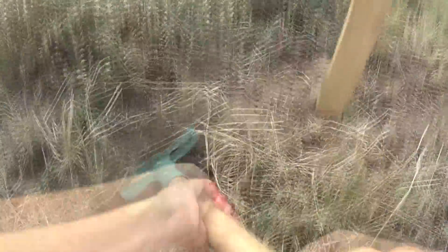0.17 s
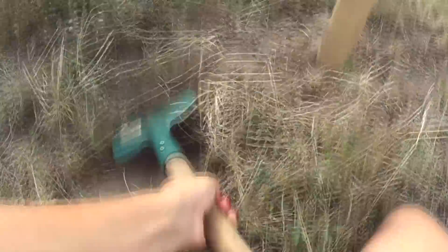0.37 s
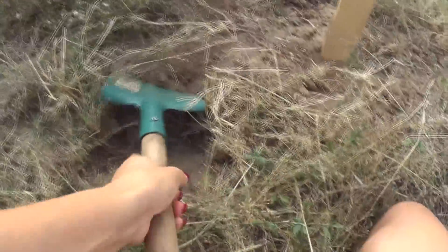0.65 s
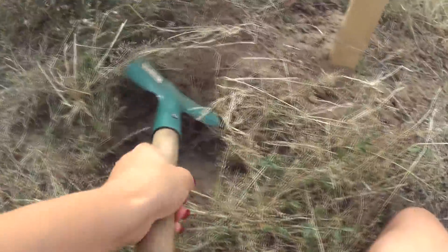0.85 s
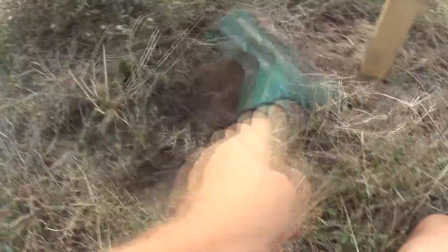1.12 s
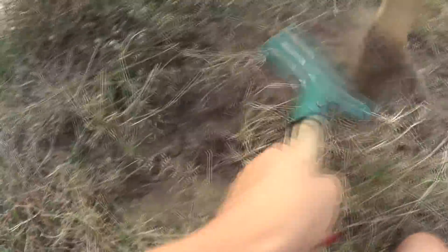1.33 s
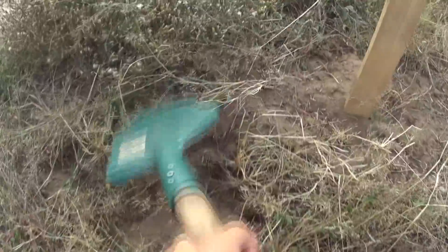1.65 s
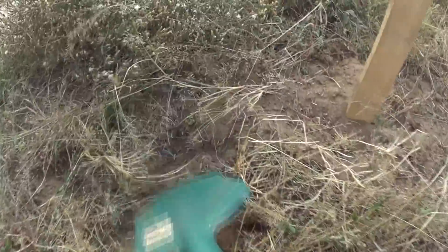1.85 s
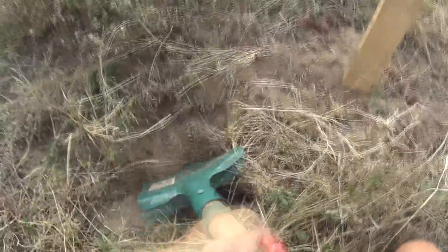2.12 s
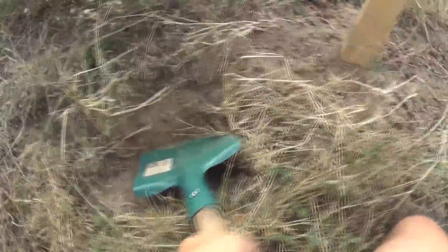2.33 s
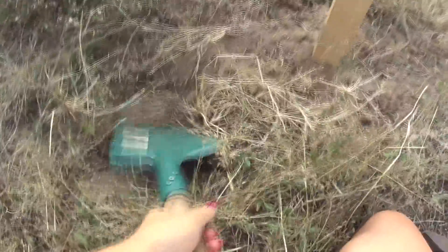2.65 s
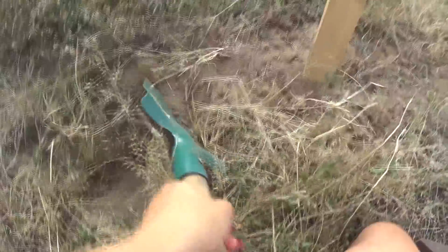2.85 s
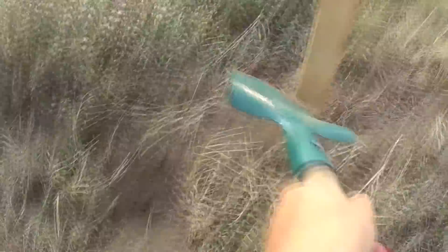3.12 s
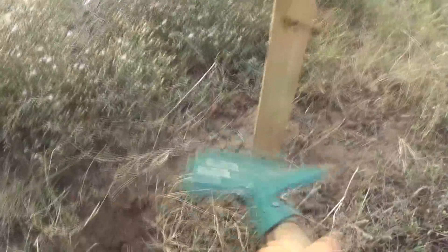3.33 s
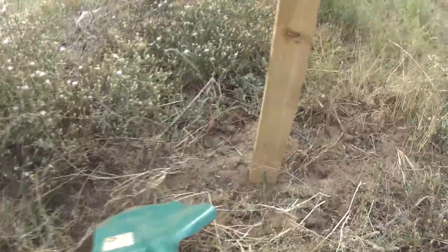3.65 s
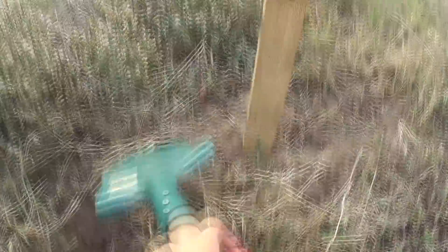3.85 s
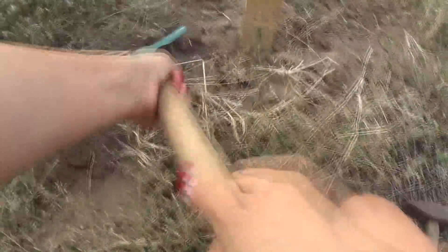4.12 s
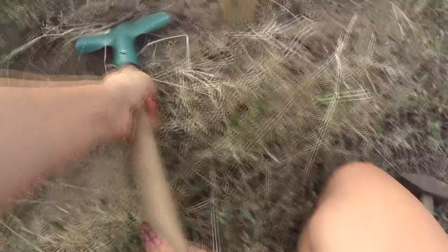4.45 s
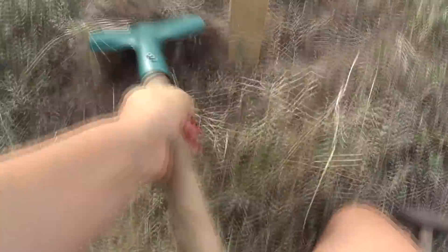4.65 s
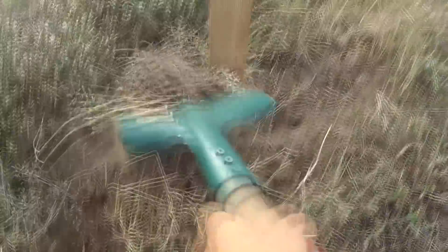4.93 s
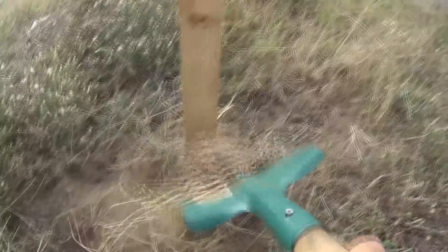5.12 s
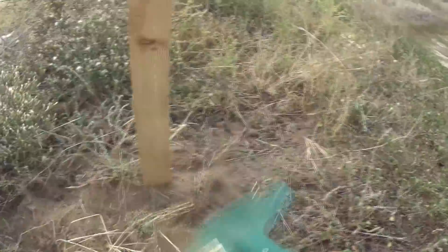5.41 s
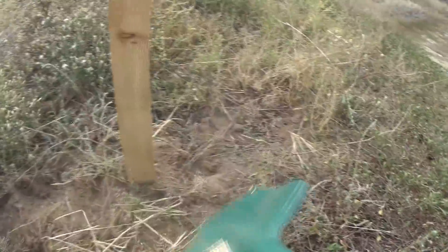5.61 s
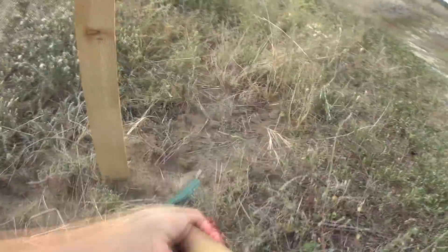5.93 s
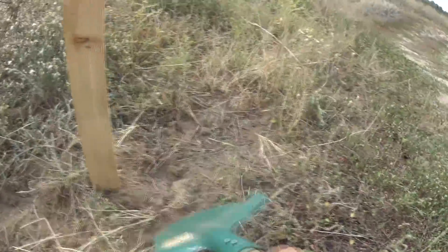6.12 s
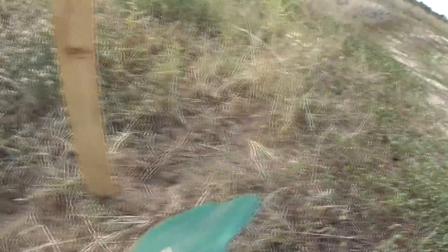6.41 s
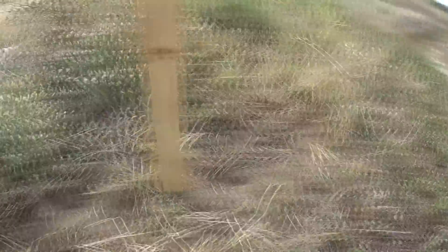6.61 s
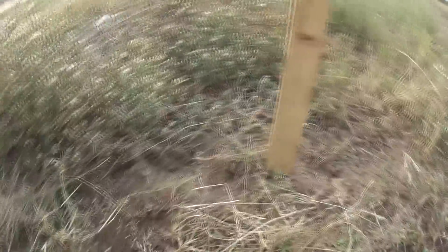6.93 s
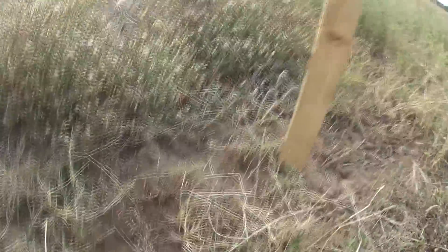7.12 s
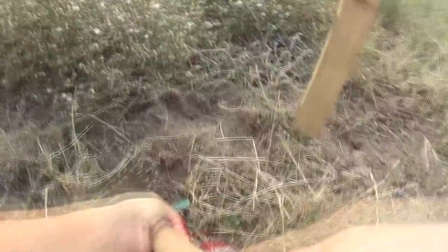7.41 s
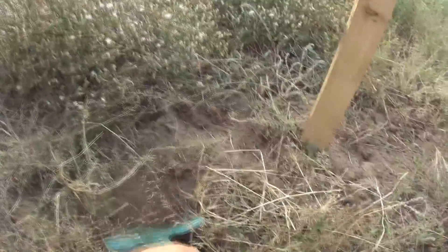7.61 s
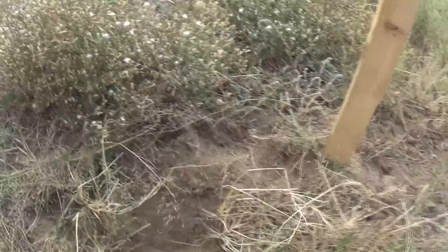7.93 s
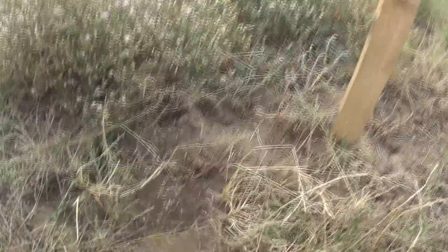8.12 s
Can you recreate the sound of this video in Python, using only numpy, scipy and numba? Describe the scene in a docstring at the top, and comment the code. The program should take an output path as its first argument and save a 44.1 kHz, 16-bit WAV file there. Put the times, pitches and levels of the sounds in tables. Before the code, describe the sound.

Outdoors, close to the microphone, a small plastic rake works dry grass and soil. Light brushing and a clack lead to a hard crunchy jab at 0.2 s, then softer rasping drags with knocks around 1.0-1.2 s and a little crumbling earth. Tines tinkle at 1.7-1.9 s. The loudest strike comes at 2.1 s, a sharp crack and bright gritty scrape, followed by hissing pulls and knocks to 3.2 s. Clacks fall at 3.5 and 3.9 s, then quieter dragging and a soft thump with loose soil at 4.6 s. From 5.3 to 6.6 s, light skimming makes thin, high tine rings, broken by a short dig near 5.8 s. A knock drops clods at 6.7 s. Strong scratching digs return at 7.2-7.4 s, then a rasp and ringing tines, ending with a knock and thud at 8.0 s. Faint air and low buffets lie beneath.

```python
"""Outdoors, close by: a small hand rake is dragged and jabbed through dry grass and soil.
Filtered grain streams make the soil crunch, stalk rasp and grass hiss; resonators make the tines sing.
Knocks are cracks with grit and a ringing head; thumps and crumbling clods are fading band noise.
Plucked tines are wavering, decaying sines; coloured noise makes the air and its buffets."""
import sys
import numpy as np
from scipy import signal
from scipy.fft import rfft, irfft, next_fast_len
from scipy.io import wavfile
from numba import njit

SR = 44100
rng = np.random.default_rng(int(sys.argv[2]) if len(sys.argv) > 2 else 0)


def master(y):
    """Save y as 16-bit WAV."""
    cut = np.clip(np.atleast_2d(y).T, -1, 1)
    pcm = np.round(cut * 32767)  # scale
    wavfile.write(sys.argv[1], SR, pcm.astype(np.int16))


N = 364266
T_S = np.arange(N) / SR

# outdoor background: (frequency [Hz], relative density [dB per Hz])
AIR_SPECTRUM = [(30, -11), (100, -6.5), (300, 7), (800, 10.5), (2000, 1), (5000, -4.5), (11000, -9.5)]
# air moving over the microphone: (frequency [Hz], relative density [dB per Hz])
RUMBLE_SPECTRUM = [(20, 17), (50, 7), (110, 13.5), (170, 12.5), (300, -9)]
# buffets: (time [s], half-length [s], peak level before waver [dB])
AIR_BUFFETS = [(0.327, 0.13, -72.5), (0.79, 0.093, -71.5), (1.946, 0.15, -70.5), (2.9, 0.33, -65.5),
               (3.503, 0.28, -69), (4.8, 0.11, -72), (7.417, 0.066, -70)]
# stereo width: (frequency [Hz], relative side-to-mid level [dB])
SIDE_SPECTRUM = [(60, -9), (130, -9.5), (300, -11), (1000, -6.5), (2000, -4.5), (4000, -8), (10000, -12.5)]

# Stroke levels are drives; scrape() trims each layer.
# digs, rake driven into the ground: (full force from [s], rise [s], hold [s], fall [s], hiss drive [dB],
#   crunch drive [dB], tine ring relative to hiss drive [dB], soil pitch [Hz])
DIG_STROKES = [(0.173, 0.031, 0.011, 0.021, -22.5, -32, -10, 400),
               (2.105, 0.0035, 0.034, 0.02, -15, -30.5, -5.5, 500),
               (2.661, 0.059, 0.039, 0.079, -34.5, -44, -22, 494),
               (3.953, 0.046, 0.05, 0.086, -30.5, -39.5, -13, 394),
               (5.816, 0.078, 0.016, 0.074, -34.5, -50.5, -10, 450),
               (7.248, 0.082, 0.072, 0.029, -17.5, -29, -2, 732),
               (8.014, 0.066, 0.18, 0.031, -36, -48.5, -8, 735)]
# pulls, rake drawn along: (full force from [s], rise [s], hold [s], fall [s], hiss drive [dB],
#   rasp drive [dB], crunch drive [dB], soil pitch [Hz], stalk pitch [Hz])
PULL_STROKES = [(0.269, 0.14, 0.095, 0.096, -48, -49, -48, 398, 1816),
                (0.484, 0.24, 0.053, 0.29, -44.5, -49.5, -53, 418, 2200),
                (0.936, 0.15, 0.15, 0.48, -44, -48, -55.5, 537, 2120),
                (1.236, 0.13, 0.2, 0.9, -55.5, -51, -66, 600, 1554),
                (1.84, 0.087, 0.098, 0.088, -64, -49.5, -59, 540, 2080),
                (2.056, 0.0056, 0.025, 0.044, -51, -47.5, -41.5, 463, 2300),
                (2.152, 0.052, 0.088, 0.25, -44, -49.5, -50.5, 457, 2000),
                (2.298, 0.076, 0.099, 0.22, -42.5, -48.5, -52.5, 460, 1600),
                (2.881, 0.17, 0.082, 0.05, -41.5, -47, -57, 577, 1900),
                (2.939, 0.008, 0.078, 0.17, -38, -40.5, -53.5, 598, 1890),
                (3.171, 0.15, 0.026, 0.033, -48.5, -39, -49.5, 740, 2380),
                (4.177, 0.11, 0.11, 0.13, -51.5, -53.5, -61, 395, 1120),
                (4.502, 0.22, 0.35, 0.4, -50, -59.5, -71, 555, 1500),
                (4.981, 0.18, 0.018, 0.073, -51.5, -46.5, -52.5, 730, 1950),
                (6.882, 0.058, 0.088, 0.18, -115, -72, -57.5, 510, 1280),
                (7.387, 0.041, 0.047, 0.19, -52, -52, -54.5, 760, 2290),
                (7.622, 0.059, 0.014, 0.15, -43.5, -40, -46.5, 675, 2420)]
# brushes, tines skimming the grass: (full force [s], rise [s], fall [s], hiss drive [dB],
#   tine ring relative to hiss drive [dB])
BRUSH_STROKES = [(0.125, 0.066, 0.045, -39, -6), (1.732, 0.047, 0.3, -45, 6),
                 (1.848, 0.005, 0.068, -56, 22), (3.771, 0.062, 0.062, -45.5, -3.5),
                 (5.328, 0.32, 0.12, -46.5, -5), (5.429, 0.085, 0.16, -43, -2),
                 (5.540, 0.21, 0.18, -49.5, 3), (5.734, 0.01, 0.096, -48, 1),
                 (6.041, 0.099, 0.053, -40, -3), (6.090, 0.18, 0.14, -47.5, -1),
                 (6.169, 0.22, 0.24, -46.5, -1), (6.440, 0.16, 0.29, -49.5, 1),
                 (6.640, 0.16, 0.84, -51, -3.5), (7.080, 0.3, 0.11, -54, -1), (7.760, 0.14, 0.06, -45.5, 9),
                 (7.850, 0.11, 0.21, -42.5, 0), (7.942, 0.13, 0.19, -46, 8)]
# drives relative to the hiss drive
DIG_STALK_DB, BRUSH_STALK_DB, BRUSH_SOIL_DB, PULL_RING_DB = -6.5, -19, -32, -16.5
DIG_STALK_HZ, BRUSH_STALK_HZ, BRUSH_SOIL_HZ = 2500, 2000, 600
STROKE_EDGE_DB = 20  # level change over one rise or fall time
REST_GRASS_DB, REST_STALK_DB, REST_SOIL_DB = -63, -60.5, -78  # rustle drive between strokes
UNEVEN_DB, UNEVEN_PER_S = 0.8, 30  # tufts and lumps resist more or less

# grain spectra: (frequency [Hz], relative density [dB per Hz])
SOIL_SPECTRUM = [(40, -57), (110, -42), (220, -7.5), (380, -2), (520, -6.5), (720, -1), (950, -1),
                 (1500, -33)]
STALK_SPECTRUM = [(150, -40), (650, -21), (1000, 1.5), (1300, -1), (2000, 1.5), (2700, 2), (3100, -3),
                  (4200, -1), (10000, -25)]
GRASS_SPECTRUM = [(2200, -71), (3100, -8), (4400, 4), (6200, 4), (8000, 3), (9500, 2.5), (11200, -4.5)]
# tine modes: (frequency [Hz], relative level when free [dB], relative level when buried [dB])
TINE_MODES = [(1120, -6, -6), (1295, 1.5, -3.5), (1803, -7, -2), (2630, -5, -5), (2825, -4, -1.5),
              (3326, 7.5, 6), (3332, 6.5, -5), (3402, -10, -12), (3890, 2.5, -4), (4000, -7.5, 1),
              (4240, 4, 2.5), (4510, -18, 0.5), (4648, -14, 2), (4680, 4, 5), (4930, 3, -44),
              (5120, -3, -0.5), (5860, 2.5, -21), (6060, 5, 4), (6254, 4, -0.5), (6910, -7.5, -31),
              (6970, 1.5, -8.5), (7170, 1, -26), (7500, -13, 3), (8450, -4, 2.5), (8360, -7, -5),
              (8660, -31, -4.5), (9400, -35, -18), (10556, 2, -4)]
FREE_T60_S, BURIED_T60_S = 0.14, 0.021
# early echoes off the ground and nearby legs: (mean delay [s], gain relative to direct [1])
GROUND_ECHOES = [(.0019, 0.25), (.0043, -0.48), (.0078, 0.17), (0.0117, 0.1)]

# knocks on stones, roots and soft ground: (time [s], crack peak level [dB], lowest [Hz], highest [Hz],
#   grit t60 [s], left-right difference [dB])
HEAD_KNOCKS = [(0.059, -42.5, 890, 4450, 0.014, -2), (0.153, -17.5, 1250, 8100, 0.049, 3),
               (0.176, -11, 1250, 2310, 0.021, 2), (0.996, -26, 1220, 9600, 0.034, 2),
               (1.067, -24, 1940, 11200, 0.048, 2), (1.185, -17, 1100, 4800, 0.057, 1),
               (1.728, -33.5, 3040, 8900, 0.069, 4), (1.844, -31.5, 1800, 8050, 0.025, 4.5),
               (2.1047, -5.5, 1980, 8360, 0.06, -0.5), (2.179, -23.5, 1224, 9580, 0.0076, 3),
               (2.654, -15, 1160, 3350, 0.016, 2.5), (2.694, -23, 3550, 10600, 0.026, 2),
               (2.938, -27, 1500, 3170, 0.15, 1.5), (3.207, -31, 600, 3270, 0.0097, -2),
               (3.394, -41, 797, 6800, 0.045, 6), (3.503, -15, 5000, 6350, 0.021, 6),
               (3.503, -21.5, 7900, 10800, 0.02, 8), (3.5055, -19, 2700, 3850, 0.028, 7),
               (3.787, -39, 690, 2880, 0.033, 10), (3.8832, -25.5, 804, 3530, 0.027, 2),
               (3.8946, -13, 910, 3150, 0.04, 1.5), (3.97, -17, 1830, 7860, 0.021, 1),
               (4.139, -36.5, 400, 6140, 0.017, 1), (4.183, -33.5, 196, 2670, 0.036, 3),
               (4.616, -27, 380, 1880, 0.13, 5), (5.086, -31, 295, 3320, 0.02, -1),
               (5.336, -34, 885, 5340, 0.049, -3), (5.8841, -23, 1620, 3100, 0.011, 2.5),
               (6.316, -37.5, 1500, 7500, 0.082, 1), (6.718, -14, 2170, 4200, 0.036, 7),
               (6.991, -33.5, 2150, 7750, 0.039, 2), (7.160, -21, 507, 2200, 0.018, 1.5),
               (7.194, -17, 2500, 8900, 0.024, 3), (7.332, -12, 990, 3160, 0.026, 4),
               (7.985, -15.5, 2450, 4170, 0.029, 2)]
# plastic head modes: (frequency [Hz], relative level [dB], t60 [s])
HEAD_MODES = [(735, -2, 0.12), (1071, -7, 0.063), (1550, -15, 0.13), (1800, -31, 0.052), (2460, -7, 0.019),
              (2700, -2, 0.023), (3440, -20.5, 0.11), (4400, -18, 0.038), (5300, -18, 0.1)]
HEAD_TRIM_DB = -37
# thumps into the earth: (time [s], peak level [dB], band centre [Hz], crumbling t60 [s])
EARTH_THUMPS = [(0.175, -19.5, 370, 0.052), (2.134, -22, 474, 0.029), (4.628, -43, 140, 0.23),
                (5.822, -32, 423, 0.021), (6.735, -40, 135, 0.32), (7.334, -43, 100, 0.052),
                (7.984, -20, 870, 0.033)]
THUMP_WIDTH_OCTAVES, CRUMBLE_SHARE = 1.15, 0.86
# clods: (time [s], level before fade [dB], t60 at 1 kHz [s], left-right difference [dB])
CLOD_LANDINGS = [(1.19, -34, 0.22, 0.5), (4.616, -42, 0.37, 5), (6.72, -28, 0.38, 6.5)]
# clod noise before fade: (frequency [Hz], relative density [dB per Hz])
CLOD_SPECTRUM = [(50, -42), (115, -23), (230, -9.5), (350, -1.5), (530, 6), (800, 0.5), (1250, 9),
                 (1800, 0), (3300, 0.5), (7500, -12.5), (11000, -26)]
# single tines bent by a stalk and let go: (time [s], pitch [Hz], peak level [dB])
TINE_PLUCKS = [(1.730, 4240, -51), (1.845, 3402, -48), (1.850, 3930, -54), (2.938, 2825, -41.5),
               (3.760, 4240, -52.5), (3.765, 3402, -55.5), (5.385, 4240, -50), (5.422, 1803, -50.5),
               (5.450, 4240, -50), (5.500, 4648, -46.5), (5.550, 4240, -54), (5.733, 1803, -56),
               (5.745, 4240, -47), (5.995, 3402, -54), (6.035, 3332, -50), (6.038, 2630, -51),
               (6.155, 5120, -45), (6.130, 3402, -53.5), (6.200, 3402, -54), (6.420, 4240, -52.5),
               (6.475, 4240, -52.5), (6.530, 3402, -56), (6.625, 5120, -52), (6.630, 3402, -56.5),
               (6.880, 3402, -55), (7.655, 2630, -45), (7.710, 1803, -56), (7.715, 4240, -50),
               (7.745, 2630, -39.5), (7.815, 3332, -48), (7.825, 1803, -50), (7.828, 2825, -45),
               (7.840, 2630, -54), (7.875, 4240, -48)]
PLUCK_RISE_S, PLUCK_T60_S, PLUCK_WAVER_RAD = 0.0027, 0.29, 0.44

LOW_CUT_HZ, HIGH_CUT_HZ = 57, 11050


def from_db(db):
    """Decibels to amplitude gain."""
    return 10 ** (np.asarray(db) / 20)


def rms_one(x):
    """Scale to unit power."""
    return x / np.sqrt(np.mean(x ** 2) + 1e-20)


def at_hz(points, hz):
    """Read a spectrum in dB on a log-frequency axis."""
    point_hz, db = np.transpose(points)
    return np.interp(np.log(hz + 1e-3), np.log(point_hz), db)


def colour(x, points):
    """Filter a steady signal by a spectrum."""
    size = next_fast_len(N)
    bin_hz = np.arange(size // 2 + 1) * SR / size
    return irfft(rfft(x, size) * from_db(at_hz(points, bin_hz)), size)[..., :N]


def band(x, low_hz, high_hz, order=2):
    """Causal Butterworth band-pass."""
    edges_hz = [low_hz, min(high_hz, SR * 4 / 9)]
    return signal.sosfilt(signal.butter(order, edges_hz, "band", fs=SR, output="sos"), x)


def ring(x, hz, t60_s):
    """Two-pole mode: a unit click starts a decaying sine of height 1."""
    radius = from_db(-60 / (t60_s * SR))
    turn_rad = 2 * np.pi * hz / SR
    return signal.lfilter([0, np.sin(turn_rad)], [1, -2 * radius * np.cos(turn_rad), radius ** 2], x + 1e-18)


def drift(rate_per_s):
    """Linearly joined random knots of unit rms."""
    knots = rng.standard_normal(2 ** 13)
    return rms_one(np.interp(T_S * rate_per_s, np.arange(len(knots)), knots))


def pan(x, left_db):
    """Set the left-right level difference."""
    return x * from_db(np.array([[left_db], [-left_db]]) / 2)


def add(out, s, sound):
    """Mix a short sound in at its time."""
    start = max(round(s * SR), 0)
    out[:, start:start + sound.shape[-1]] += sound[:, :N - start]


def spread(mid, points, side_db):
    """Colour a sound; scatter from the ground around adds an independent left-right difference."""
    scatter = rms_one(colour(rng.standard_normal(N), points))
    side = colour(scatter, SIDE_SPECTRUM)
    return rms_one(colour(mid, points)) + from_db(side_db) * side * [[1], [-1]]


def swell(s, half_length_s):
    """Hyperbolic-secant rise and fall around a moment."""
    return 1 / np.cosh(np.clip((T_S - s) / half_length_s * 1.3, -30, 30))


def outdoors():
    """Faint diffuse noise, plus low noise swelling as air buffets the moving microphone."""
    air = from_db(-63.0) * spread(rng.standard_normal(N), AIR_SPECTRUM, side_db=6.5)
    flow = sum(from_db(db) * swell(s, half_length_s) for s, half_length_s, db in AIR_BUFFETS)
    rumble = spread(rng.standard_normal(N), RUMBLE_SPECTRUM, side_db=8.5)
    return air + flow * from_db(2.0 * drift(10)) * rumble


def strokes():
    """Digs, pulls and brushes rise, hold and fall in dB; power weights pitch and ring where they overlap."""
    rows = [(s, rise, hold, fall, db, db + DIG_STALK_DB, soil_db, soil_hz, DIG_STALK_HZ, ring_db)
            for s, rise, hold, fall, db, soil_db, ring_db, soil_hz in DIG_STROKES]
    rows += [(*pull, PULL_RING_DB) for pull in PULL_STROKES]
    rows += [(s, rise, 0, fall, db, db + BRUSH_STALK_DB, db + BRUSH_SOIL_DB,
              BRUSH_SOIL_HZ, BRUSH_STALK_HZ, ring_db)
             for s, rise, fall, db, ring_db in BRUSH_STROKES]
    columns = np.transpose(rows)[..., None]
    s, rise, hold, fall, grass_db, stalk_db, soil_db, soil_hz, stalk_hz, ring_db = columns
    t = T_S[::20]
    before = np.maximum(s - t, 0) / rise
    after = np.maximum(t - s - hold, 0) / fall
    force_db = -STROKE_EDGE_DB * (before + after)
    layers = ((soil_db, REST_SOIL_DB, soil_hz), (stalk_db, REST_STALK_DB, stalk_hz),
              (grass_db, REST_GRASS_DB, ring_db))
    controls = []
    for db, rest_db, trait in layers:
        power = from_db(db + force_db) ** 2 + 1e-20
        level_db = 10 * np.log10(power.sum(0) + from_db(rest_db) ** 2)
        blend = (power * trait).sum(0) / power.sum(0)
        uneven_db = UNEVEN_DB * drift(UNEVEN_PER_S)
        controls.append((np.interp(T_S, t, level_db) + uneven_db, np.interp(T_S, t, blend)))
    return controls


def grains(per_s, size_db, rub, catch_db):
    """Uneven snaps over smooth rubbing, clumped as the tines catch and slip; unit rms."""
    sizes = from_db(size_db * np.minimum(rng.exponential(1, N), 4)) * rng.choice([-1, 1], N)
    snaps = rms_one(sizes * (rng.random(N) < per_s / SR))
    rubbing = rub * rng.standard_normal(N)
    return rms_one((snaps + rubbing) * from_db(catch_db * drift(140)))


@njit
def glide(x, turn_rad, radius):
    """Two-pole resonance with a moving pitch, in radians per sample."""
    y = np.zeros(len(x))
    for i in range(2, len(x)):
        y[i] = x[i] - x[i - 2] + 2 * radius * np.cos(turn_rad[i]) * y[i - 1] - radius ** 2 * y[i - 2]
    return y


def pitched(x, hz, width_hz, peak_db):
    """Add a broad moving resonance to a grain stream."""
    hump = glide(x, 2 * np.pi * hz / SR, np.exp(-np.pi * width_hz / SR))
    return x + from_db(peak_db) * np.pi * width_hz / SR * hump / 2


def scatter_db(level_db):
    """Hard contact is a point source; a light rustle spreads over the whole tuft."""
    return np.clip(-0.28 * (level_db + 68), -6, 6)


def tines(force, levels_db, t60_s, shift_db):
    """Scraping force drives every mode; levels drift as the contact point shifts along the tines."""
    modes = []
    for row, db in zip(TINE_MODES, levels_db):
        gain = from_db(db + shift_db * drift(12))
        modes.append(gain * rms_one(ring(force, row[0], t60_s)))
    return rms_one(sum(modes[::2]) - sum(modes[1::2]))


def pings(per_s, t60_s):
    """Stalks flick the tines at random: decaying sines at scattered pitches; unit rms."""
    out, t = np.zeros((1, N)), T_S[:SR // 6]
    fade = from_db(-60 * t / t60_s)
    for when, pitch, size in rng.random((int(per_s * N / SR), 3)):
        hz = 1900 * (10500 / 1900) ** pitch
        glint = from_db(-14 * size) * fade * np.sin(2 * np.pi * hz * t)
        add(out, when * T_S[-1], glint[None])
    return rms_one(out[0])


def near_ground(x, sway):
    """Early echoes comb the sound; delays shift as the rake and the microphone move."""
    out = x.copy()
    for delay_s, gain in GROUND_ECHOES:
        heard_at_s = T_S - delay_s * (1 + sway * drift(3))
        out += gain * np.array([np.interp(heard_at_s, T_S, ear) for ear in x])
    return out / np.sqrt(1 + sum(gain ** 2 for _, gain in GROUND_ECHOES))


def scrape():
    """Soil, stalk and grass friction drives tines that ring long when free, briefly when buried."""
    (soil_db, soil_hz), (stalk_db, stalk_hz), (grass_db, ring_db) = strokes()
    _, free_db, buried_db = np.transpose(TINE_MODES)
    free = from_db(ring_db)
    rubbing = 1 / np.sqrt(1 + free ** 2)

    crunch = pitched(grains(1500, 1.55, 0.59, 3.6), soil_hz, width_hz=280, peak_db=14)
    rasp = pitched(grains(2200, 5.5, 0.92, 1.5), stalk_hz, width_hz=1200, peak_db=7.5)
    hiss = grains(4500, 6.0, 0.76, 3.2)
    soil = from_db(soil_db - 4.0) * spread(crunch, SOIL_SPECTRUM, scatter_db(soil_db))
    stalks = from_db(stalk_db - 3.5) * spread(rasp, STALK_SPECTRUM, scatter_db(stalk_db))
    grass = from_db(grass_db - 4.5) * spread(hiss, GRASS_SPECTRUM, scatter_db(grass_db) + 3.5)
    friction = near_ground(soil + np.sqrt(rubbing) * stalks + rubbing * grass, sway=0.0383)

    buried_force = grains(4000, 3.8, 0.95, 2.15)
    buried = from_db(grass_db - 7.5) * tines(buried_force, buried_db, BURIED_T60_S, shift_db=0.5)
    # pressing hard chokes the long ring
    damped_db = grass_db - 0.51 * np.maximum(grass_db + 28, 0)
    free_force = grains(700, 3.6, 0.26, 3.4)
    singing = from_db(damped_db - 1.5) * tines(free_force, free_db, FREE_T60_S, shift_db=2.0)
    glints = from_db(damped_db - 6.0) * pings(per_s=150, t60_s=0.13)
    return pan(friction + rubbing * (buried + free * (singing + glints)), 0.69)


def knocks():
    """Contact gives a band-limited crack, a spray of grit and a modal ring of the head."""
    out, t = np.zeros((2, N)), T_S[:SR // 4]
    for s, peak_db, low_hz, high_hz, t60_s, left_db in HEAD_KNOCKS:
        grit = rng.standard_normal(len(t)) * from_db(-60 * t / t60_s)
        force = (t == 0) + 0.69 * grit
        crack = band(force, low_hz, high_hz, order=3) + 0.15 * band(force, 460, 5900, order=1)
        crack = crack / np.abs(crack).max()
        head = sum(from_db(db + HEAD_TRIM_DB) * ring(crack, mode_hz, mode_t60_s)
                   for mode_hz, db, mode_t60_s in HEAD_MODES)
        add(out, s, pan(from_db(peak_db) * (crack + head), left_db))
    return out


def thumps():
    """Soft ground swallows the top of a blow: a band-passed click with a little fading crumble."""
    out, t = np.zeros((2, N)), T_S[:SR // 3]
    half_width = 2 ** (THUMP_WIDTH_OCTAVES / 2)
    for s, peak_db, hz, t60_s in EARTH_THUMPS:
        crumbs = rng.standard_normal(len(t)) * from_db(-60 * t / t60_s)
        force = (t == 0) + CRUMBLE_SHARE * crumbs / np.linalg.norm(crumbs)
        thud = band(force, hz / half_width, hz * half_width)
        add(out, s, pan(from_db(peak_db) * thud / np.abs(thud).max(), 1.0))
    return out


def clods():
    """Loose earth lands and crumbles: noise bands, the low thud outlasting the bright spatter."""
    out, t = np.zeros((2, N)), T_S[:SR // 2]
    centres_hz = np.geomspace(70, 9000, 15)
    weights = from_db(at_hz(CLOD_SPECTRUM, centres_hz)) * np.sqrt(centres_hz)
    weights = weights / np.linalg.norm(weights)
    onset = 1 - np.exp(-t / 0.0033)
    for s, level_db, t60_s, left_db in CLOD_LANDINGS:
        for hz, weight in zip(centres_hz, weights):
            noise = rng.standard_normal((2, len(t)))
            mid, side = band(noise, hz / 2 ** (1 / 4), hz * 2 ** (1 / 4))
            fade = from_db(-60 * t / t60_s * (hz / 1000) ** 0.3) * onset
            earth = rms_one(mid) + 0.29 * rms_one(side) * np.array([[1], [-1]])
            add(out, s, pan(from_db(level_db) * weight * fade * earth, left_db))
    return out


def plucks():
    """A released tine speaks quickly and dies away, its phase wavering as it drags on."""
    out, t = np.zeros((2, N)), T_S[:SR // 2]
    envelope = (1 - np.exp(-t / PLUCK_RISE_S)) * from_db(-60 * t / PLUCK_T60_S)
    envelope = envelope / envelope.max()
    waver_rad = PLUCK_WAVER_RAD * drift(60)
    for s, hz, level_db in TINE_PLUCKS:
        phase_rad = 2 * np.pi * hz * t + np.roll(waver_rad, -round(s * SR))[:len(t)]
        add(out, s, pan(from_db(level_db) * envelope * np.sin(phase_rad), 0.67))
    return out


def scene():
    """Sum of all sources, in the open and within arm's reach."""
    return outdoors() + scrape() + knocks() + thumps() + clods() + plucks()


def record(dry):
    """Round the highest peaks, thin the deep bass and cut the top steeply."""
    rounded = 0.7 * np.tanh(dry / 0.7)
    low_cut = signal.butter(2, LOW_CUT_HZ, "high", fs=SR, output="sos")
    high_cut = signal.ellip(12, 0.1, 80, HIGH_CUT_HZ, fs=SR, output="sos")
    return signal.sosfilt(high_cut, signal.sosfilt(low_cut, rounded))


dry = scene()
out = record(dry)
master(out)
```